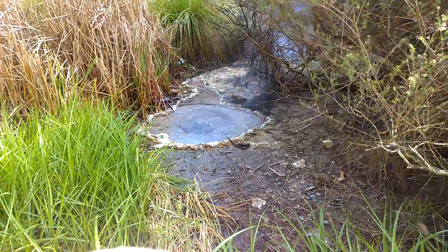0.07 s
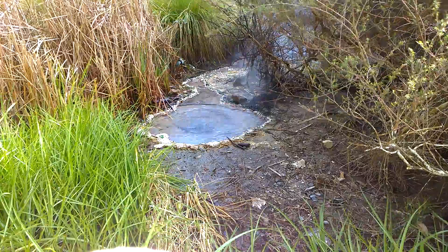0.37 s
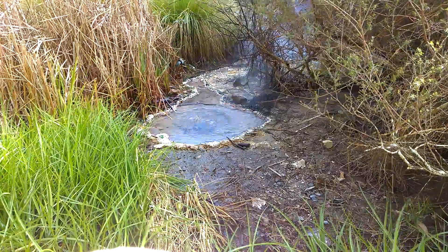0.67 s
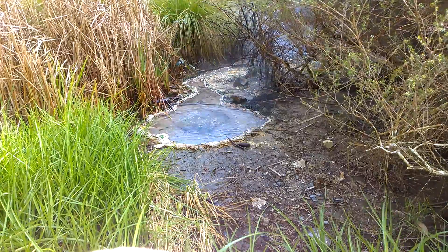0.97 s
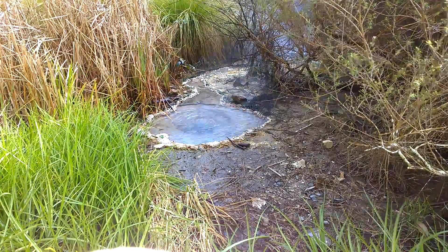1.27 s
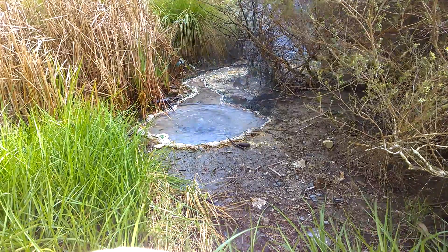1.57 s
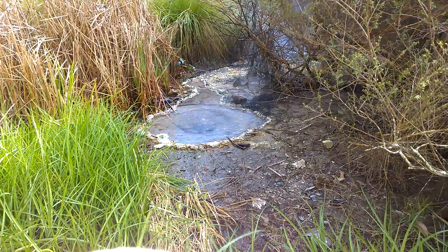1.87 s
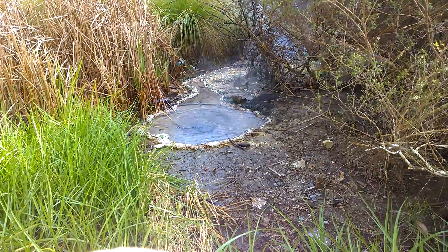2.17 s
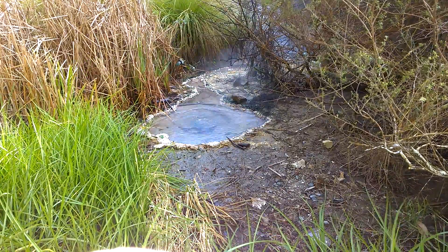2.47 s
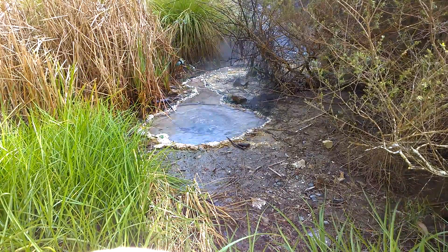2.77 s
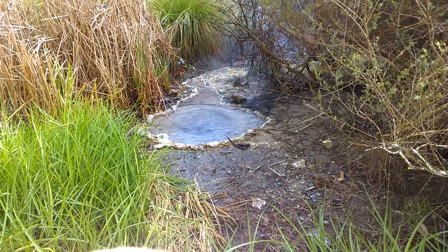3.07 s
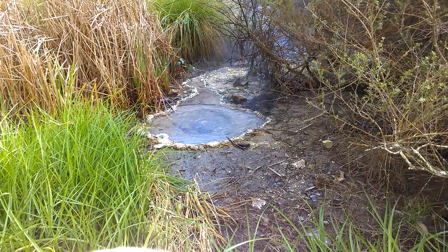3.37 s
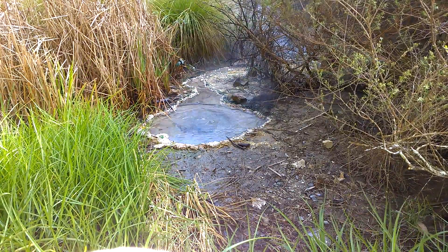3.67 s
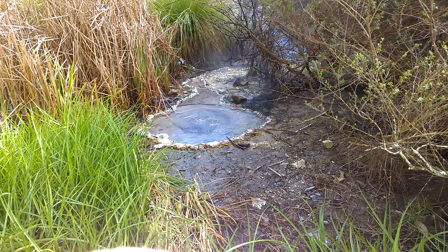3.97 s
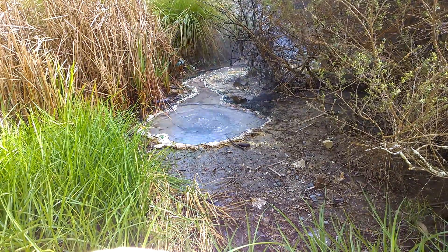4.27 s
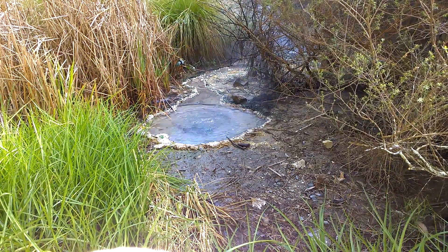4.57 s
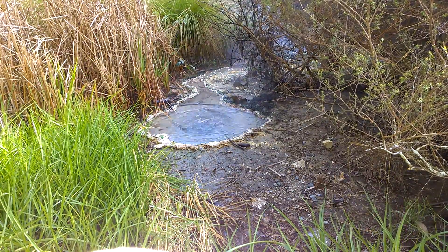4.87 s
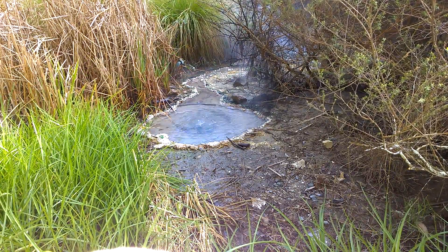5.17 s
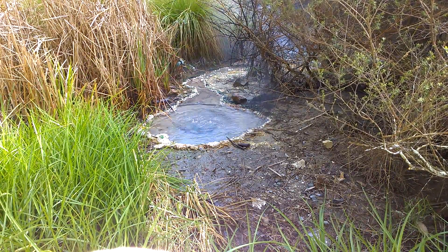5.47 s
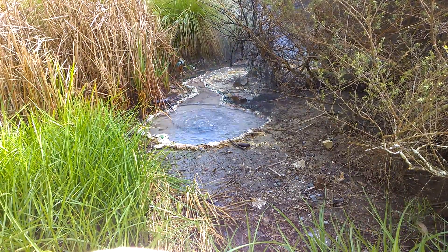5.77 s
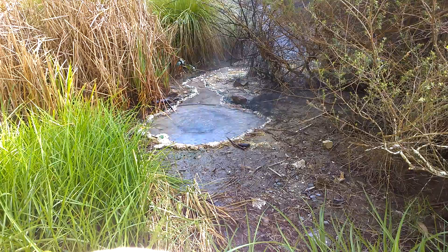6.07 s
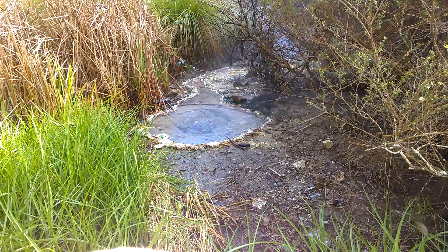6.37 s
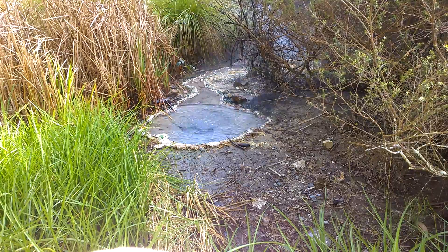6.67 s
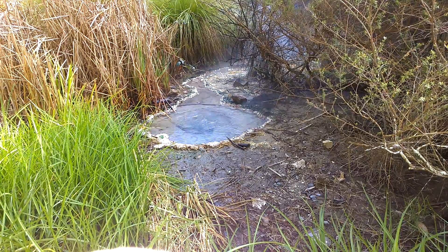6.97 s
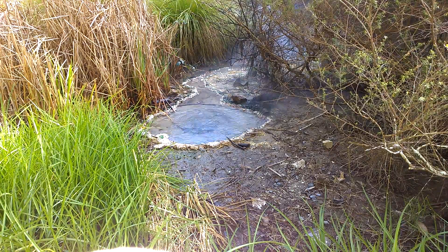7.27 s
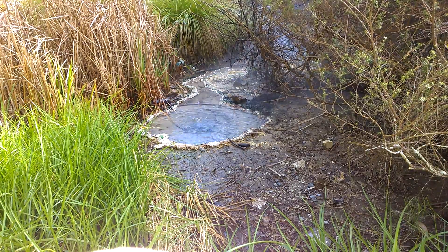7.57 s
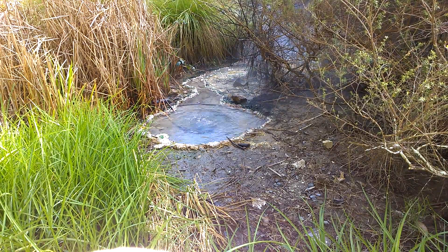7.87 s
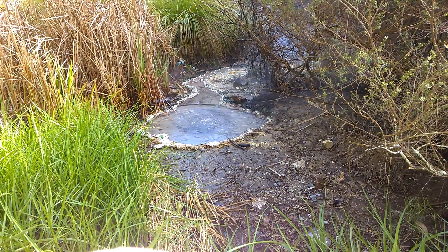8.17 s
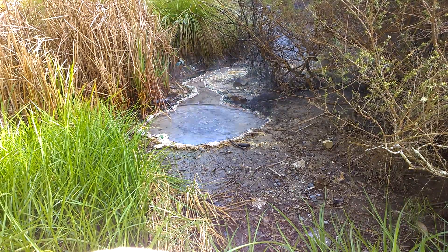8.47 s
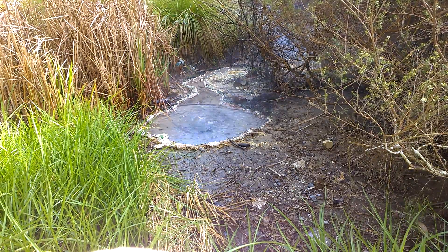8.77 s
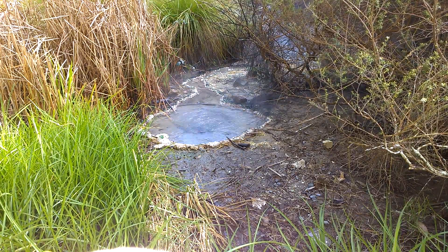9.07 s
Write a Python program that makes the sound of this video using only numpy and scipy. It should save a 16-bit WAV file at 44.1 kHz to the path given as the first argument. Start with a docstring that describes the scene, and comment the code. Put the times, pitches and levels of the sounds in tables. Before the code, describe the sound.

A small hot spring bubbles outdoors for about nine seconds, a dense, low churning of water. It starts slightly subdued, builds until nearly 3 seconds and then stays steady, with irregular deep gulps from about 2 seconds on. Larger bubbles burst with short plops around 2.5 and 3 seconds, most clearly at 4 seconds, and more often between 7 and 9 seconds. Wind buffets the microphone with low rumbles and thumps from about 0.5 to 3.3 seconds, hardest at around 1.3 seconds. It drops away in the middle and returns lightly around 7 seconds. A steady deep hum lies under everything. The camera's own motor adds a faint, fluttering whir and a thin, wavering whine, mostly on the left, dipping very slightly in pitch at 6 seconds.

```python
"""Hot spring among reeds

A small spring churns with dense, low bubbling and a few larger plops: each bubble is a pocket of gas
that rings briefly. Gusts buffet the microphone, mostly in the first seconds, over a steady deep hum.
The camera's own motor whirs and whines faintly through its case, more on the left."""
import sys
import numpy as np
from scipy import signal
from scipy.fft import rfft, irfft
from scipy.io import wavfile
from scipy.ndimage import uniform_filter1d

SR = 44100
rng = np.random.default_rng(int(sys.argv[2]) if len(sys.argv) > 2 else 0)


def wav_out(sig):
    """Save sig, one row per channel (or a flat mono array), as 16-bit PCM at SR to the path in sys.argv[1]."""
    wavfile.write(sys.argv[1], SR, np.round(np.clip(np.atleast_2d(sig).T, -1, 1) * 32767).astype(np.int16))


N = 410571
TIME = np.arange(N) / SR
HZ = np.fft.rfftfreq(N, 1 / SR)

# pitches at which the vent and basin ring (pitch [Hz], half width [Hz], level [dB])
BASIN_RINGS = [(213.8, 31.6, -67.5), (309, 27.5, -71), (381, 14.8, -74), (446, 16.5, -78), (524, 22, -79.5),
               (637.4, 24.5, -76.5), (750, 50, -76), (986, 16, -77)]
# the churn between those pitches (frequency [Hz], level [dB])
CHURN_TONE = [(20, -90), (70, -70.5), (140, -73), (300, -79), (600, -84.5), (950, -80.5), (1200, -84.5),
              (1500, -94.5), (3000, -104), (6000, -110), (9000, -128), (16000, -140)]
# how the pool reaches the two microphone openings (frequency [Hz], likeness [0-1], left lead [rad])
POOL_STEREO = [(100, 1, 0.05), (312, 0.96, -0.01), (437, 0.9, -0.82), (740, 0.9, -1), (940, 0.45, -1.03),
               (1500, 0.6, -2), (6000, 0.56, -2.1)]
# the boil builds up, then churns steadily (time [s], level [dB])
BOIL_LEVEL = [(0, -3.5), (.6, -4), (1.6, -2), (2.7, 1), (3.6, -.4), (9.3, -0.3)]
# gulps: gas wells up and breaks into deep bubbles (start [s], level [dB])
GAS_GULPS = [(2.16, 0), (2.4, 0), (2.98, 6.5), (3.43, 4), (3.8, 1), (4.22, 1.5), (4.4, 0.5), (4.71, 3.5),
             (5.19, -3), (5.45, 2), (5.6, 3), (5.75, -1.5), (6.1, 0), (6.8, 0), (6.93, 5), (7.16, 5.5),
             (7.42, -0.5), (7.68, 2), (8.57, 2), (8.78, 3.5), (9.14, 6)]
# the hum and the camera's sounds creep up at first (time [s], level [dB])
BACKGROUND_LEVEL = [(0, -3), (1, -1.6), (2.2, 0.5)]
# pitches at which the camera case rings (pitch [Hz], half width [Hz], left [dB], right [dB])
CASE_RINGS = [(1152, 57, -71.5, -73.5), (1232, 121, -77.5, -86), (1820, 200, -83, -96),
              (2087, 302, -84.5, -95), (2580, 150, -91.5, -106), (3830, 810, -106, -100),
              (4720, 440, -103, -108), (5854, 240, -97, -105), (6360, 130, -101, -116),
              (7160, 760, -101, -125), (10560, 510, -111, -137), (12876, 366, -116, -137),
              (15553, 1600, -113, -134)]
# how the case shakes the two openings (frequency [Hz], likeness [0-1], left lead [rad])
CASE_STEREO = [(1107, 0.95, -3), (1395, 0.87, -2), (1670, 0.9, -6), (1900, 0, -3.5), (2450, 0, -4.5),
               (2970, 0.73, -4), (3500, 0.76, -1.5), (3940, 0.7, 0), (4560, 0.56, 3.5), (5700, 0.7, 5.5),
               (7200, 0.4, 7)]
# the breeze drops in the middle and picks up again (time [s], level [dB])
BREEZE_LEVEL = [(0, -40), (2.4, -43.5), (3.6, -43), (4.3, -45), (5.8, -44.5), (6.4, -42.5), (8.3, -41),
                (9.3, -41.5)]
# gusts at the microphone (start [s], length [s], level [dB])
WIND_GUSTS = [(0.267, 0.18, -40.5), (0.6, 0.23, -29.5), (0.931, 0.23, -29.5), (1.191, 0.061, -20.5),
              (1.335, 0.24, -28.5), (1.76, 0.08, -36.5), (2.13, 0.11, -34), (2.6, 0.11, -40),
              (2.846, 0.074, -33.5), (3.05, 0.24, -35), (6.826, 0.19, -39), (7.256, 0.46, -40)]
# the tone of the wind's rumble (frequency [Hz], relative level [dB])
WIND_TONE = [(7.1, -42), (12, -4), (37, 3), (81, -3.5), (145, -8.5), (414, -25), (445, -25.5), (583, -43.5),
             (639, -35.5), (900, -44), (1170, -77), (1980, -120)]
# single large swirls of wind (time [s], level [dB], pitch [Hz])
WIND_THUMPS = [(0.649, -28, 45), (0.728, -24.5, 32.5), (1.25, -18, 117), (1.347, -22.5, 50.5),
               (2.904, -23, 50)]
# large bubbles bursting (time [s], level [dB], pitch [Hz])
BIG_BUBBLES = [(1.845, -36, 775), (2.478, -31, 697), (3.012, -29, 200), (3.035, -30.5, 693),
               (3.925, -32.5, 110), (3.959, -24.5, 820), (3.969, -32, 720), (4.762, -33, 342),
               (5.167, -36, 622), (5.505, -33, 439), (6.165, -33, 1000), (6.987, -31, 212.7),
               (7.008, -36, 436), (7.451, -31, 232), (7.576, -30, 730), (7.768, -29.5, 281),
               (8.135, -37.5, 250), (8.16, -34.5, 630), (8.319, -33, 517), (8.861, -32.5, 980),
               (8.88, -33, 670)]


def amp(db):
    """Turns decibels into a gain to multiply by."""
    return 10 ** (np.asarray(db) / 20)


def unit(x):
    """Scales a signal to an average power of 1."""
    return x / np.sqrt(np.mean(x ** 2) + 1e-20)


def curve(rows):
    """Joins (time, value) points with straight lines."""
    return np.interp(TIME, *np.transpose(rows))


def across(rows):
    """Fills in a table's columns at every frequency."""
    hz, *columns = np.transpose(rows)
    return [np.interp(np.log(HZ + 1), np.log(abs(hz) + 1), c) for c in columns]


def add(mix, s, sound):
    """Mixes a sound in at s seconds."""
    part = mix[max(round(s * SR), 0):][:len(sound)]
    part += sound[:len(part)]


def white():
    """The spectrum of a noise equally strong at all frequencies."""
    return (rng.standard_normal(len(HZ)) + 1j * rng.standard_normal(len(HZ))) * np.sqrt(N * SR) / 2


def drift(rate_hz):
    """A smooth random wobble; a higher rate makes it quicker."""
    points = rng.standard_normal(4000)
    hz = np.fft.rfftfreq(len(points), TIME[-1] / len(points))
    slow = irfft(rfft(points) * np.exp(-(hz / rate_hz) ** 2) * (hz > .5))
    return unit(np.interp(TIME, np.linspace(0, TIME[-1], len(points)), slow))


def resonance(hz, width):
    """A gain that favours the frequencies near one pitch."""
    return 1 / (1 + ((HZ - hz) / width) ** 2)


def stereo(a, b, rows):
    """Two spectra: the left is a; the right blends a with unrelated b, shifted in phase."""
    likeness, lead = across(rows)
    likeness = np.clip(likeness, 0, 1)
    right = likeness * a + np.sqrt(1 - likeness ** 2) * b
    return np.array([a, right * np.exp(-1j * lead)])


def bubble(hz, cycles, glide):
    """A pocket of gas rings for a few cycles; its pitch rises as it nears the surface."""
    age = np.arange(int(5 * cycles / hz * SR)) * hz / SR / cycles
    tone = np.sin(2 * np.pi * cycles * (age + glide * age ** 2 / 2))
    return tone * np.exp(-age) * (1 - np.exp(-age * cycles * 2))


def swarm(per_s, low_hz, high_hz, cycles, spread_db, sizes):
    """Bubbles of many sizes ring at random moments; a few are much stronger."""
    out = np.zeros(N)
    count = int(per_s * N / SR / sizes)
    for hz in np.geomspace(low_hz, high_hz, sizes):
        ring = hz * bubble(hz, cycles * rng.uniform(0.48, 1.42), glide=0.064)
        start, luck, sign = rng.random((1500, 3))[:count].T
        strength = amp(spread_db * np.minimum(-np.log(1 - luck), 3.5)) * np.sign(sign - .5)
        samples = (start * N).astype(int)[:, None] + np.arange(len(ring))
        out += np.bincount(samples.ravel(), (strength[:, None] * ring).ravel(), N)[:N]
    return unit(out) * np.sqrt(high_hz - low_hz)


def gas_flow(trickle_db=-3, gulp_s=0.13):
    """Each gulp of gas swells and ebbs on top of a steady trickle."""
    power = np.full(N, amp(trickle_db) ** 2)
    arch = np.sin(np.pi * np.arange(0, 1, 1 / (gulp_s * SR)))
    for s, db in GAS_GULPS:
        add(power, s, (amp(db) * arch) ** 2)
    return np.sqrt(power)


def pool(deep_db=-2, light_db=-4, wash_db=-4, uneven_db=1.8, surge_db=2.4):
    """Deep bubbles come in gulps, light ones more evenly; the basin colours them all."""
    basin = sum((amp(db) * resonance(hz, width)) ** 2 for hz, width, db in BASIN_RINGS)
    colour = np.sqrt(amp(across(CHURN_TONE)[0]) ** 2 + basin)
    deep = np.array([swarm(per_s=260, low_hz=110.9, high_hz=476.3, cycles=2.51, spread_db=3.5, sizes=24)
                     for _ in range(2)])
    light = np.array([swarm(per_s=900, low_hz=474.7, high_hz=1408, cycles=4.87, spread_db=2.5, sizes=32)
                      for _ in range(2)])
    deep *= amp(deep_db) * unit(gas_flow() * amp(uneven_db * drift(rate_hz=14.5)))
    light *= amp(light_db + surge_db * drift(rate_hz=7))
    bubbles = stereo(*rfft(deep + light), POOL_STEREO)
    # countless tiny bubbles blur into a wash of noise, which carries the treble alone
    wash = amp(np.interp(HZ, [1200, 1600], [wash_db, 0])) * stereo(white(), white(), POOL_STEREO)
    return irfft(colour * (bubbles + wash), N) * amp(curve(BOIL_LEVEL))


def hum(hz=37.2, level_db=-48.5, waver_db=-0.1):
    """A deep hum that wavers slightly."""
    turns = np.cumsum(hz + .7 * drift(rate_hz=3)) / SR
    return np.sqrt(2) * amp(level_db + waver_db * drift(rate_hz=1.7)) * np.sin(2 * np.pi * turns)


def motor_whir(flutter_db=1.34, groups=4):
    """The motor's rubbing rings in the case; each group of pitches flutters by itself."""
    out = np.zeros((2, N))
    for group in np.array_split(np.array(CASE_RINGS), groups):
        power = sum((amp([[left], [right]]) * resonance(hz, w)) ** 2 for hz, w, left, right in group)
        rubbing = stereo(white(), white(), CASE_STEREO)
        out += irfft(np.sqrt(power) * rubbing, N) * amp(flutter_db * drift(rate_hz=17.3))
    return out


def motor_whine(first_hz=1881, slowed_hz=1855, slows_at_s=6, slowing_s=0.1494, wander_hz=14.02):
    """The motor's tone wanders and jitters, and settles a little lower as the motor slows."""
    hz = np.interp(TIME, [slows_at_s, slows_at_s + slowing_s], [first_hz, slowed_hz])
    hz += wander_hz * drift(rate_hz=4.3)
    angle = 2 * np.pi * np.cumsum(hz) / SR + .6 * drift(rate_hz=35)
    tone = np.sqrt(2) * np.sin(angle) * amp(drift(rate_hz=22))
    return amp([[-57], [-76]]) * tone  # left, right


def electronics(hz=7810, left_db=-87, right_db=-98):
    """The camera's electronics give a thin, nearly steady tone."""
    turns = np.cumsum(hz + 3 * drift(rate_hz=4.4)) / SR
    return np.sqrt(2) * amp([[left_db], [right_db]]) * np.sin(2 * np.pi * turns)


def airflow(rise_s=0.034, fall_s=0.06):
    """The wind's strength: each gust rises, holds and dies away on top of the breeze."""
    power = amp(curve(BREEZE_LEVEL)) ** 2
    for s, length, db in WIND_GUSTS:
        rise = np.clip((TIME - s) / rise_s, 0, 1)
        fall = np.exp(-np.maximum(TIME - s - length, 0) / fall_s)
        power += (amp(db) * rise * fall) ** 2
    return np.sqrt(power)


def wind(level_db=0.5, calm_db=-44, likeness=0.81, dull_hz=90, strong_db=-30, lumps_db=2.5, cap_db=-26):
    """Swirls of air push on the microphone; a long, strong gust sheds smaller, brighter ones."""
    gust = airflow()
    push = gust ** 3 / (gust ** 2 + amp(calm_db) ** 2)  # in a lull the swirls die away
    push = amp(cap_db) * np.tanh(push / amp(cap_db))  # the hardest gusts level off
    swirls = stereo(white(), white(), [(100, likeness, 0)]) * amp(across(WIND_TONE)[0])
    bright = unit(irfft(swirls, N))
    dull = unit(irfft(swirls / np.sqrt(1 + (HZ / dull_hz) ** 4), N))
    brightness = np.clip(uniform_filter1d(gust, SR // 4) / amp(strong_db), 0, 1)
    rumble = brightness * bright + (1 - brightness) * dull
    rumble /= np.sqrt(uniform_filter1d((rumble ** 2).mean(0), SR // 10) + 1e-9)  # even out its level
    return amp(level_db) * push * rumble * unit(amp(lumps_db * drift(rate_hz=22)))


def thumps(left_db=4.5, right_db=-2):
    """A large passing swirl pulls and then pushes the air, about once."""
    out = np.zeros(N)
    t = np.arange(-SR // 10, SR // 10) / SR
    for s, db, hz in WIND_THUMPS:
        add(out, s + t[0], amp(db) * np.sin(2 * np.pi * hz * t) * np.exp(-2 * (hz * t) ** 2))
    return amp([[left_db], [right_db]]) * out


def plops(level_db=-1, cycles=2.24, glide=0.0026, swell_s=0.0019, gentle_db=-35, small_db=-44):
    """Large bubbles burst, the strongest most abruptly, and each sheds four small ones."""
    out = np.zeros(N)
    for s, db, hz in BIG_BUBBLES:
        ring = bubble(hz, cycles, glide)
        swell = np.tanh(np.arange(len(ring)) / SR / (swell_s * amp(gentle_db - db) ** 2))
        add(out, s, amp(db + level_db) * ring * swell)
        for delay, octaves in rng.random((4, 2)):
            small = bubble(hz * 2 ** (octaves - .4), cycles, glide)
            add(out, s + .035 * (delay - .25), amp(small_db) * small)
    return out


def reed_echoes(sound, level_db=-4, fade_s=0.13):
    """Reeds and bank scatter a sound, adding a short tail of echoes."""
    t = np.arange(SR // 4) / SR
    tails = rng.standard_normal((2, len(t))) * amp(-60 * t / fade_s) * (t > .004)
    tails += tails.mean(0)  # left and right hear much the same echoes
    echoes = np.array([signal.oaconvolve(sound, tail / np.linalg.norm(tail))[:N] for tail in tails])
    return sound + amp(level_db) * echoes


def scene(hiss_db=-121.5):
    """Pool, wind and hum outside; motor, electronics and hiss inside the camera."""
    hiss = amp(hiss_db) * irfft(np.array([white(), white()]), N)
    camera = motor_whir() + motor_whine() + electronics() + hiss
    water = pool() + reed_echoes(plops())
    return water + wind() + thumps() + (hum() + camera) * amp(curve(BACKGROUND_LEVEL))


def record(dry, fade_s=0.004, top_hz=15750):
    """Fades both ends quickly and cuts the highest treble."""
    fade = np.minimum(np.minimum(TIME, TIME[::-1]) / fade_s, 1)
    low_pass = signal.firwin(1023, top_hz, window=("kaiser", 9), fs=SR)
    return signal.oaconvolve(dry * fade, low_pass[None], "same")


dry = scene()
out = record(dry)
wav_out(out)
```